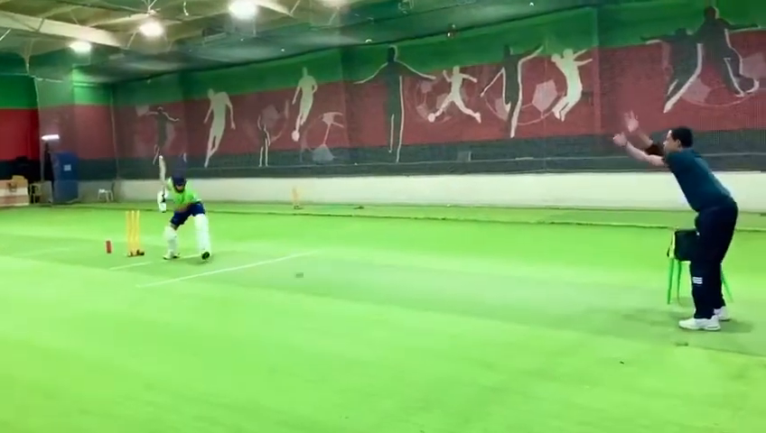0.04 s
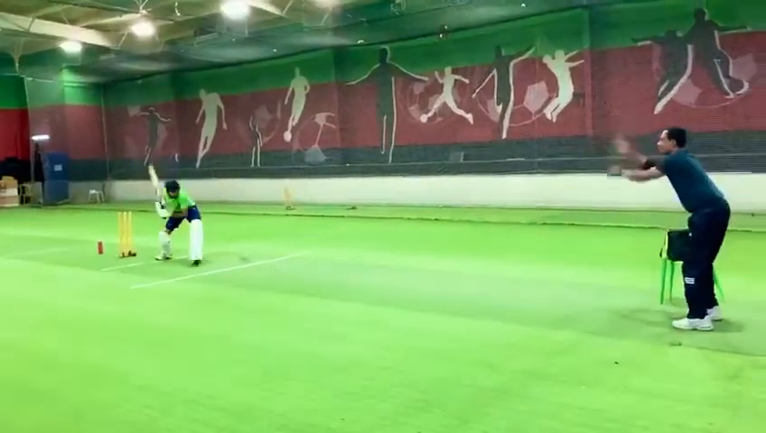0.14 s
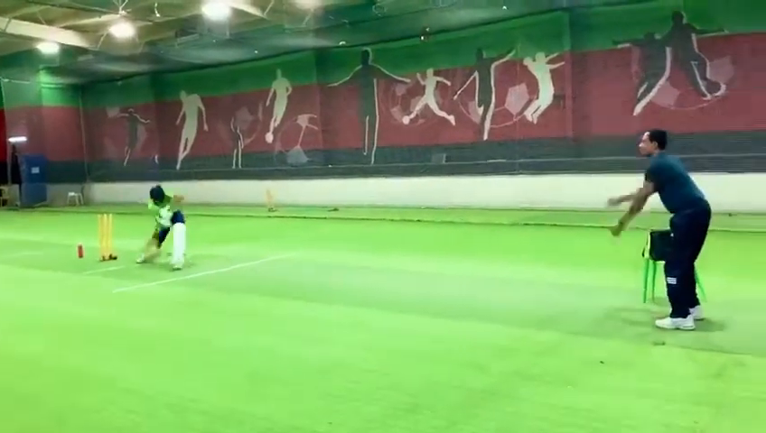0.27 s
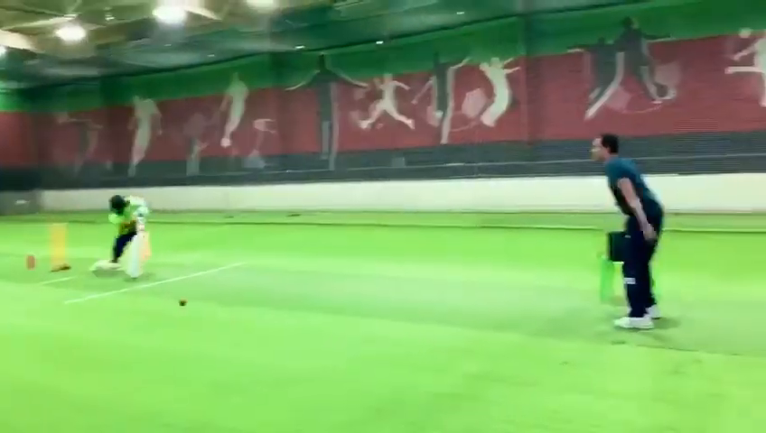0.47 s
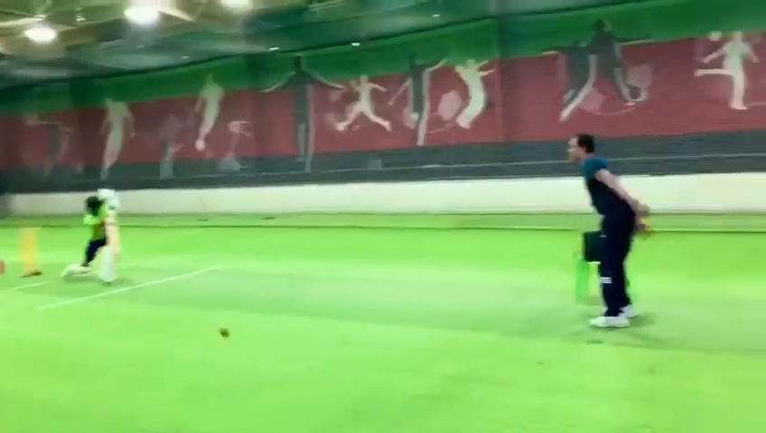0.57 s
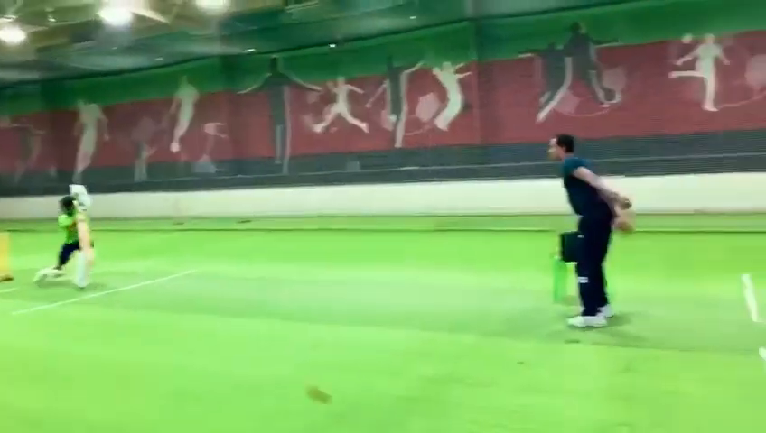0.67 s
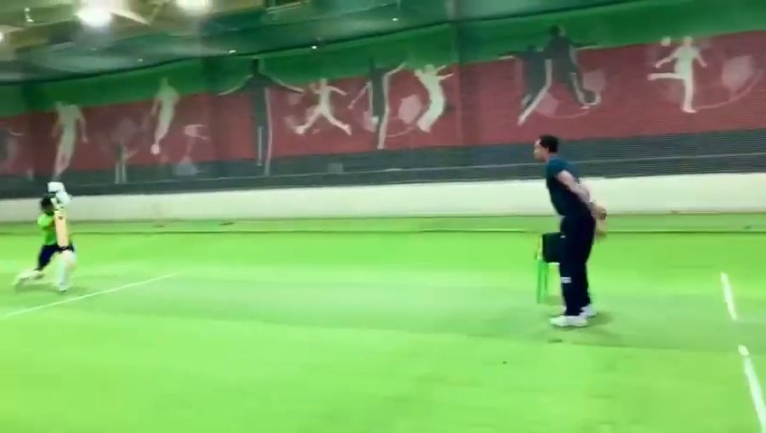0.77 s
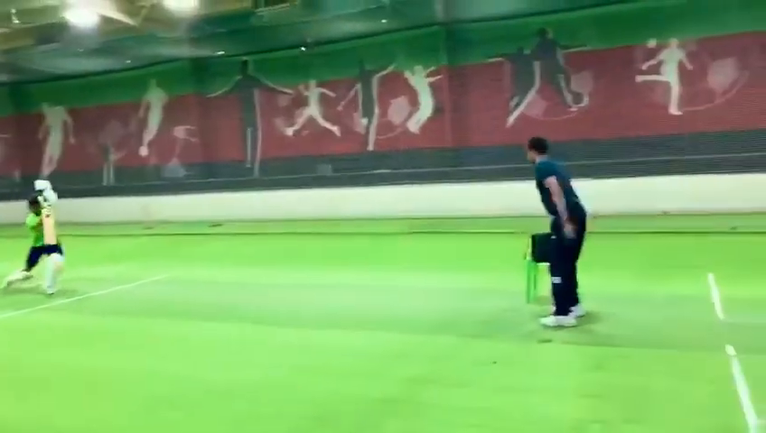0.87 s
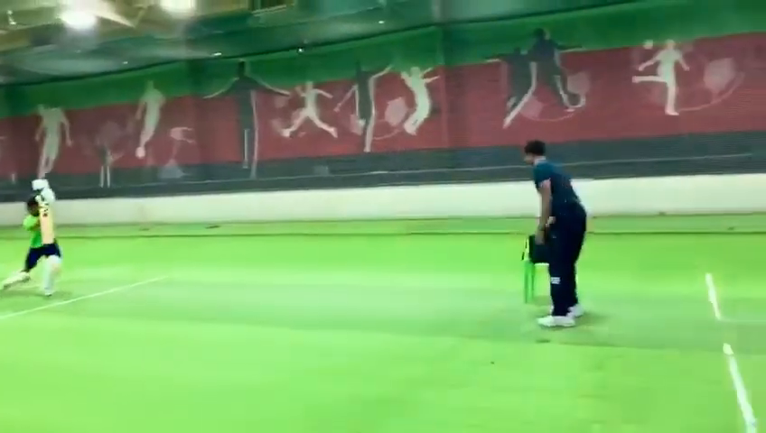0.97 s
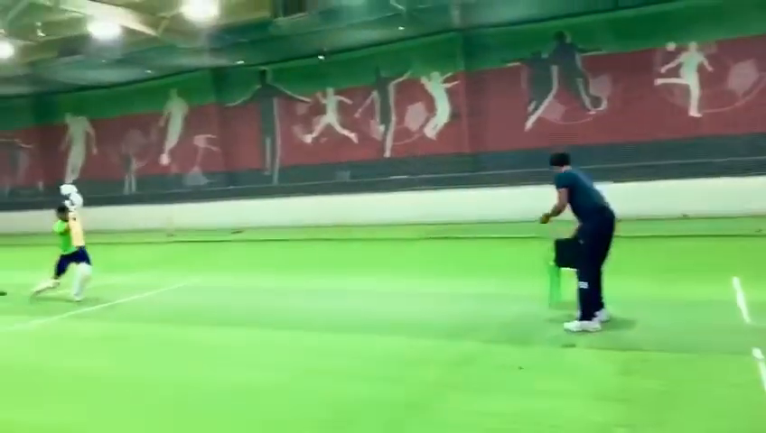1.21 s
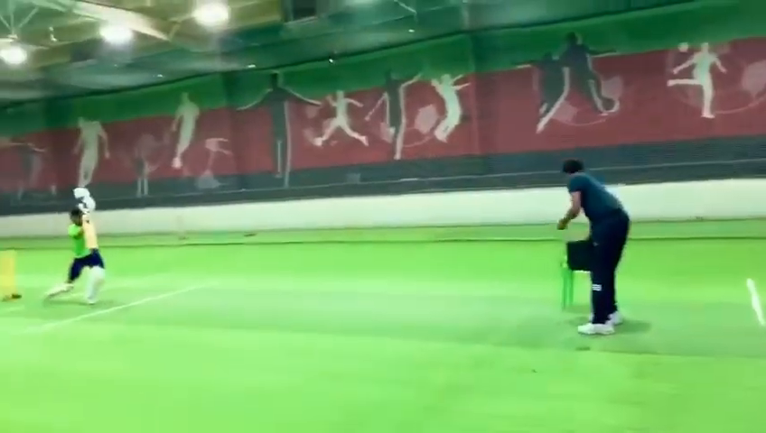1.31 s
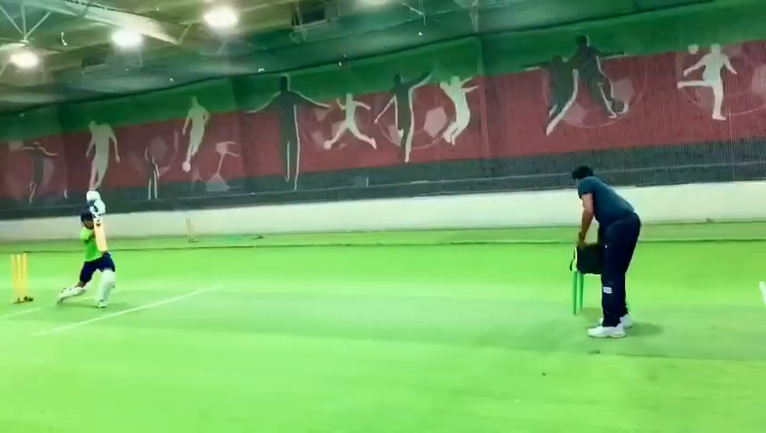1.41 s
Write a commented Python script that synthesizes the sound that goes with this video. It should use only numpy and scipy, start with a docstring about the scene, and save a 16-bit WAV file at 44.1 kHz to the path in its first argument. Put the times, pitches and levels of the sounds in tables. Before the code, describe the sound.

A cricket bat strikes a hard ball with one loud, dry wooden crack; a big indoor hall answers with quick slaps and a long echoing tail, then a fainter knock with a low thud, over a low rumble.

```python
"""Steady background noise rumbles and hisses under a low ventilation hum in a large indoor hall, and soft
low-passed noise thuds run through the scene. A cricket bat hits a ball: a noise crack sounds beside damped
wooden modes, then roof and walls return slaps, echoes and a long tail of decaying noise with a few lingering
pitches. A thin tick of noise follows; half a second after the stroke the ball knocks against the far side, a
fainter blow of the same kind with a low thud in answer. Near the end a shoe scuffs the mat twice, in grainy noise."""
import sys
import numpy as np
from scipy import signal
from scipy.fft import rfft, irfft, next_fast_len
from scipy.io import wavfile
from scipy.ndimage import map_coordinates

SR = 44100
rng = np.random.default_rng(int(sys.argv[2]) if len(sys.argv) > 2 else 0)


def master(y):
    """Save y as 16-bit WAV."""
    cut = np.clip(np.atleast_2d(y).T, -1, 1)
    pcm = np.round(cut * 32767)  # scale
    wavfile.write(sys.argv[1], SR, pcm.astype(np.int16))


N = 63945
T = np.arange(N) / SR

# The bat's stroke: (time [s], level [dB], right ear's lead [s])
BAT_STROKE = (0.2346, -3.1, 0.00017)
# Modes of bat and ball: (frequency [Hz], relative level [dB], t60 [s])
BAT_MODES = [(254.7, 4.5, 0.019), (532, -2.5, 0.025), (741, 2, .018), (1073, -17.5, 0.018),
             (3220, -19, 0.013), (3610, -4.5, 0.013), (5020, -14, .011), (6760, -6.5, 0.0076),
             (8230, -13.5, 0.0065), (10110, -8, 0.0046)]
# The ball's knock on the far side: (time [s], level [dB], right ear's lead [s])
BOARD_KNOCK = (0.7354, -19, .00010)
# Modes of the struck board: (frequency [Hz], relative level [dB], t60 [s])
BOARD_MODES = [(210, 4, 0.018), (425, 3, 0.021), (670, -9, 0.009), (1020, -9.5, 0.018), (2200, -6, 0.0082),
               (3450, -1.5, 0.006), (4640, -6, 0.0053), (6130, -4.5, .005)]
# Scattered reflections from roof and walls:
# (delay [s], level before dulling [dB], t60 [s], low-pass cutoff [Hz])
WALL_SLAPS = [(0.0146, -11, 0.02, 7000), (0.0203, -8.5, 0.032, 3420), (.029, -20, .05, 4000),
              (0.059, -21, 0.033, 2500), (.112, -36, 0.14, 9050)]
# Colour of the scattered reflections: (frequency [Hz], relative spectral level [dB])
SCATTER_COLOUR = [(100, -7.5), (170, 8.5), (330, 4.5), (580, 6), (920, -1.5), (1330, 7.5), (1620, -3.5),
                  (1900, 3.5), (2700, -7.5), (3450, 0), (4100, -3.5), (7000, -11), (10300, -11),
                  (12000, -19)]
# Mirror-like echoes of the stroke: (delay [s], level [dB re direct hit], right ear's lead [s])
MIRROR_ECHOES = [(.0148, -18, 0.0046), (0.0207, -16, -0.0065)]
# Colour of the tail noise, with a deep gap near 8.7 kHz: (frequency [Hz], relative spectral level [dB])
TAIL_NOISE_COLOUR = [(53, -37.5), (90, -16), (160, -11), (195, -4), (300, -5), (450, -8), (605, -7.5),
                     (820, -7.5), (900, -12), (1220, -13.5), (1640, -17.5), (2020, -10), (2650, -19),
                     (3260, -18), (3600, -13), (5000, -18), (5580, -22), (6590, -17.5), (7400, -20.5),
                     (8700, -64), (10300, -18), (12500, -47)]
# Decay of the hall's tail: (frequency [Hz], t60 [s])
TAIL_DECAY = [(125, 1.9), (300, 2.45), (700, 2.29), (2000, 1.76), (4000, 1.68), (7000, 1.16), (11000, 0.69)]
# Build-up of the tail, slowest in the lows: (frequency [Hz], rise time [s])
TAIL_BUILD_UP = [(150, 0.12), (350, 0.07), (700, .012), (4000, 0.021)]
# Pitches that linger in the hall after the stroke: (frequency [Hz], level [dB], t60 [s])
HALL_RINGS = [(555, -44, 1.57), (606, -41.5, 1.5), (1059, -42, 1.3), (1331, -46.5, 1.36), (3480, -43, 1.37),
              (3650, -40, 1.3)]
# Stereo width of diffuse sound: (frequency [Hz], side level relative to mid [dB])
DIFFUSE_WIDTH = [(60, -17.5), (110, -14.5), (200, -12), (350, -7.5), (630, -2.5), (1140, -2), (2060, 1),
                 (3720, -3.5), (6700, 1.5), (12100, -3.5)]
# Low thuds, the one at 0.75 s the bass answer to the knock:
# (time [s], level before dulling [dB], low-pass cutoff [Hz])
LOW_THUDS = [(0.023, -29, 326), (0.108, -39.5, 300), (0.347, -42, 500), (0.362, -32, 495),
             (0.454, -26, 600), (0.469, -27, 600), (0.645, -27.5, 496), (0.75, -21.5, 159),
             (0.766, -35, 500), (0.811, -35, 98), (1.008, -36, 400), (1.101, -31.5, 130)]
# Colour of the low thuds: (frequency [Hz], relative spectral level [dB])
THUD_COLOUR = [(40, -13), (90, -2), (280, 1), (450, -7.5), (900, -18), (3000, -55)]
# A shoe scuffs the mat: (time [s], level [dB])
SHOE_SCUFFS = [(1.108, -49.5), (1.134, -55)]
# Colour of the scuffs: (frequency [Hz], relative spectral level [dB])
SHOE_SCUFF_COLOUR = [(1000, -20), (4000, 4), (5000, -7), (6400, 2), (8000, -14), (9500, -24), (12000, -25)]
# Colour of the background noise, with a deep gap near 8.6 kHz: (frequency [Hz], relative spectral level [dB])
BACKGROUND_COLOUR = [(15, -68), (25, -26), (51, -7.5), (71, -5), (124, -5), (284, -15), (367, -14.5),
                     (420, -23), (562, -23), (711, -17.5), (800, -21), (2100, -24.5), (7000, -46.5),
                     (8600, -76), (10500, -54.5), (12500, -70)]
# Course of the ventilation's hum: (time [s], level [dB])
HUM_LEVEL = [(0, -53.5), (.7, -49), (1.0, -47.5), (1.12, -43.5), (1.45, -44.5)]

# Blows
BAT_CRACK_DB, BAT_CRACK_T60_S, BAT_CRACK_LOW_HZ = -17, 0.014, 1500
KNOCK_CRACK_DB, KNOCK_CRACK_T60_S, KNOCK_CRACK_LOW_HZ = -10.5, 0.0066, 1200
CONTACT_S = 0.00022  # the ball squashes against the wood
CRACK_TOP_HZ, BODY_LOW_HZ = 7880, 60
BASS_LAG_HZ, BASS_LAG_Q = 300, 1
# Reflections
ECHO_LOW_HZ = 450
NEAR_DB, NEAR_T60_S = -23, 0.15  # scatter from the floor and nets around the batter
KNOCK_NEAR_DB, KNOCK_NEAR_T60_S = -43, 0.11  # scatter around the board
KNOCK_SLAP_DB, KNOCK_SLAP_DELAY_S, KNOCK_SLAP_T60_S = -38, 0.0125, 0.014
LATE_PER_S, LATE_DB, LATE_T60_S, LATE_FROM_S = 39, -21.5, 0.91, 0.03
LATE_LOW_HZ, LATE_DULL_HZ = 450, 4000
# Reverberant tail
TAIL_DB, TAIL_DELAY_S = -26, 0.021
TAIL_GRAIN_DB, TAIL_GRAIN_HZ = 1.18, 120.3
TAIL_SWELL_DB, TAIL_SWELL_HZ = 1.53, 14.8
KNOCK_TAIL_DB, KNOCK_TAIL_HZ = -22.5, 4000  # relative to the stroke's tail; low-pass cutoff
RING_WAVER_HZ = 9
# Small sounds and background
TICK_S, TICK_NOISE_DB, TICK_T60_S, TICK_LOW_HZ = 0.2862, -19, 0.0045, 7000  # level before high-pass
THUD_T60_S = 0.1
SCUFF_RISE_S, SCUFF_T60_S = 0.0013, 0.15
SCUFF_GRAIN_DB, SCUFF_GRAIN_HZ = 1, 300
BACKGROUND_DB = -41.5
HUM_HZ, HUM_WAVER_DB, HUM_WAVER_HZ = 68.5, -0.2, 12
CUTOFF_HZ = 12000


def stroke():
    """Superposition: bat on ball is a direct hit plus scatter, discrete echoes and reverberation."""
    start, db, lead = BAT_STROKE
    hit = blow(start, db, BAT_MODES, BAT_CRACK_DB, BAT_CRACK_T60_S, BAT_CRACK_LOW_HZ)
    direct = two_ears(hit, lead)
    near = from_db(NEAR_DB) * hall_noise(SCATTER_COLOUR) * burst(start, 0.0011, NEAR_T60_S)
    early = near + mirror_echoes(hit) + slaps(start)
    return direct + early + late_echoes(hit) + tail(start) + rings(start)


def knock():
    """Impact at a distance: the ball on the far side gives a faint blow, scatter, one slap and a dull tail."""
    start, db, lead = BOARD_KNOCK
    hit = blow(start, db, BOARD_MODES, KNOCK_CRACK_DB, KNOCK_CRACK_T60_S, KNOCK_CRACK_LOW_HZ)
    near = from_db(KNOCK_NEAR_DB) * burst(start, 0.0023, KNOCK_NEAR_T60_S)
    slap = from_db(KNOCK_SLAP_DB) * burst(start + KNOCK_SLAP_DELAY_S, 0.00067, KNOCK_SLAP_T60_S)
    scatter = (near + slap) * hall_noise(SCATTER_COLOUR)
    dull_tail = from_db(KNOCK_TAIL_DB) * cut(tail(start), KNOCK_TAIL_HZ, "low")
    return two_ears(hit, lead) + scatter + dull_tail


def blow(start, db, modes, crack_db, crack_t60, crack_low_hz):
    """Modal excitation: a brief contact sounds a noisy crack and heavily damped modes."""
    body = np.zeros(N)
    for k, (hz, level, t60) in enumerate(modes):
        sine = np.sin(2 * np.pi * hz * (T - start))
        envelope = burst(start, CONTACT_S + 0.5 / hz, t60)  # contact plus half a period to rise
        body += (-1) ** k * from_db(level) * sine * envelope  # signs alternate from mode to mode
    noise = cut(rng.standard_normal(N), crack_low_hz, "high")
    noise = rms_one(cut(noise, CRACK_TOP_HZ, "low"))
    crack = from_db(crack_db) * noise * burst(start, 0.00039, crack_t60)
    return from_db(db) * bass_lag(cut(body, BODY_LOW_HZ, "high") + crack)


def bass_lag(x):
    """Dispersion: an all-pass holds the lows back, so that a blow sweeps quickly downward."""
    w = 2 * np.pi * BASS_LAG_HZ / SR
    spread = np.sin(w) / (2 * BASS_LAG_Q)
    a = [1 + spread, -2 * np.cos(w), 1 - spread]
    return signal.lfilter(a[::-1], a, x)


def mirror_echoes(hit):
    """Specular reflection: delayed, thinner copies of the hit reach the two ears at different times."""
    thin = cut(hit, ECHO_LOW_HZ, "high", order=1)
    out = np.zeros((2, N))
    for delay, level, lead in MIRROR_ECHOES:
        out += from_db(level) * two_ears(delayed(thin, delay), lead)
    return out


def slaps(start):
    """Diffuse reflection: roof and walls answer a hit with bursts of scattered noise."""
    out = np.zeros((2, N))
    for delay, db, t60, dull_hz in WALL_SLAPS:
        scatter = cut(hall_noise(SCATTER_COLOUR), dull_hz, "low", order=1)
        out += from_db(db) * scatter * burst(start + delay, 0.00081, t60)
    return out


def late_echoes(hit):
    """Sparse random reflection: beams and far walls return thin, dull copies at other moments in each ear."""
    arrives = (rng.random((2, N)) < LATE_PER_S / SR) & (T > LATE_FROM_S)
    signs = rng.choice([-1, 1], (2, N))
    paths = arrives * signs * np.exp(-np.log(1000) * T / LATE_T60_S)
    copy = cut(cut(hit, LATE_LOW_HZ, "high"), LATE_DULL_HZ, "low", order=1)
    return from_db(LATE_DB) * signal.fftconvolve(paths, copy[None], axes=1)[:, :N]


def tail(start):
    """Reverberation: diffuse, grainy noise whose lows build up slowest and whose treble dies first."""
    def envelope(hz):
        """Each band swells and sinks on its own while it decays."""
        swell = from_db(TAIL_SWELL_DB * wander(TAIL_SWELL_HZ))
        return swell * burst(start + TAIL_DELAY_S, at_hz(TAIL_BUILD_UP, hz), at_hz(TAIL_DECAY, hz))
    level = from_db(TAIL_DB + TAIL_GRAIN_DB * wander(TAIL_GRAIN_HZ))
    return level * hall_noise(TAIL_NOISE_COLOUR, envelope)


def rings(start):
    """Narrow-band resonance: a few pitches linger, wavering in amplitude and phase differently in each ear."""
    out = np.zeros((2, N))
    for hz, db, t60 in HALL_RINGS:
        noise = rng.standard_normal((2, 2, N + SR // 4))
        a, b = rms_one(cut(noise, RING_WAVER_HZ, "low")[..., -N:])  # drop the filter's settling
        phase = 2 * np.pi * hz * T
        tone = a * np.sin(phase) + b * np.cos(phase)
        out += from_db(db) * tone * burst(start + TAIL_DELAY_S, at_hz(TAIL_BUILD_UP, hz), t60)
    return out


def tick():
    """Transient: a few milliseconds of high-passed noise are heard as one thin tick after the stroke."""
    noise = cut(rng.standard_normal((2, N)), TICK_LOW_HZ, "high")
    return from_db(TICK_NOISE_DB) * noise * burst(TICK_S, 0.0003, TICK_T60_S)


def thuds():
    """Damped low-frequency bursts: soft low-passed thuds, one of them the bass answer to the knock."""
    noise = hall_noise(THUD_COLOUR)
    out = np.zeros((2, N))
    for start, db, dull_hz in LOW_THUDS:
        out += from_db(db) * cut(noise, dull_hz, "low") * burst(start, 0.0023, THUD_T60_S)
    return out


def scuffs():
    """Friction: a shoe on the mat gives a light double burst of gritty noise."""
    grain = from_db(SCUFF_GRAIN_DB * wander(SCUFF_GRAIN_HZ))
    grit = grain * hall_noise(SHOE_SCUFF_COLOUR)
    return grit * sum(from_db(db) * burst(start, SCUFF_RISE_S, SCUFF_T60_S) for start, db in SHOE_SCUFFS)


def background():
    """Stationary noise and a tone: steady rumble, faint hiss and the ventilation's low, wavering hum."""
    hum_db = np.interp(T, *np.transpose(HUM_LEVEL)) + HUM_WAVER_DB * wander(HUM_WAVER_HZ)
    tone = np.sqrt(2) * np.sin(2 * np.pi * HUM_HZ * T)  # rms 1
    return from_db(BACKGROUND_DB) * hall_noise(BACKGROUND_COLOUR) + from_db(hum_db) * tone


def hall_noise(colour, envelope=None):
    """Diffuse field: partly correlated stereo noise, rms 1 before each half-octave band gets its envelope."""
    size = next_fast_len(N)
    hz = np.maximum(np.fft.rfftfreq(size, 1 / SR), 1)
    mid, side = rfft(rng.standard_normal((2, size)))
    width = from_db(at_hz(DIFFUSE_WIDTH, hz))
    pair = (mid + width * side * [[1], [-1]]) / np.sqrt(1 + width ** 2)
    noise = rms_one(irfft(from_db(at_hz(colour, hz)) * pair, size))
    if envelope is None:
        return noise[:, :N]
    spectrum = rfft(noise)
    band = np.round(2 * np.log2(np.clip(hz, 125, CUTOFF_HZ)))
    out = np.zeros((2, N))
    for k in np.unique(band):
        out += irfft(spectrum * (band == k), size)[:, :N] * envelope(2 ** (k / 2))
    return out


def two_ears(x, lead):
    """Interaural time difference: the right ear leads, or lags if the lead is negative."""
    return np.array([delayed(x, lead), x])


def delayed(x, seconds):
    """Propagation delay: the same sound, later, by interpolation between samples."""
    return map_coordinates(x, [np.arange(N) - seconds * SR], order=3)


def burst(start, rise, t60):
    """Exponential damping: a straight rise multiplies a decay of 60 dB per t60."""
    age = np.maximum(T - start, 0)
    return np.minimum(age / rise, 1) * np.exp(-np.log(1000) * age / t60)


def wander(hz):
    """Random modulation: low-passed noise moves by chance up to about the given rate, with rms 1."""
    noise = rng.standard_normal(N + SR // 4)
    return rms_one(cut(noise, hz, "low")[-N:])  # drop the filter's settling


def cut(x, hz, kind, order=2):
    """Linear filtering: a Butterworth response, flat in its passband."""
    sos = signal.butter(order, np.clip(hz, 10, 0.45 * SR), kind, fs=SR, output="sos")
    return signal.sosfilt(sos, x)


def at_hz(points, hz):
    """Logarithmic frequency scale: interpolate a table between its listed frequencies."""
    table_hz, values = np.transpose(points)
    return np.interp(np.log(hz), np.log(table_hz), values)


def rms_one(x):
    """Normalisation of power: scale to rms 1."""
    return x / np.sqrt(np.mean(x ** 2) + 1e-20)


def from_db(db):
    """Level to amplitude: 20 dB is a factor of ten."""
    return 10 ** (np.asarray(db) / 20)


def scene():
    """Superposition: stroke and knock over the small sounds and the background of the hall."""
    return stroke() + knock() + tick() + thuds() + scuffs() + background()


def record(dry):
    """Saturation and band-limiting: peaks beyond 0.95 clip, then a steep low-pass cuts the top."""
    clipped = np.clip(dry, -0.95, 0.95)
    low_pass = signal.ellip(10, 0.3, 80, CUTOFF_HZ, fs=SR, output="sos")  # ripple, stopband [dB]
    return signal.sosfilt(low_pass, clipped)


dry = scene()
out = record(dry)
master(out)
```